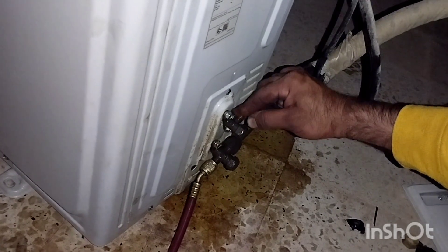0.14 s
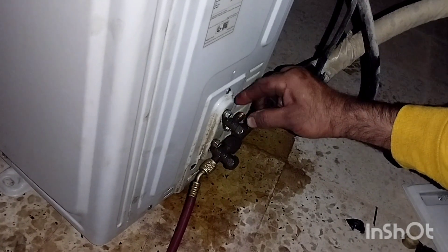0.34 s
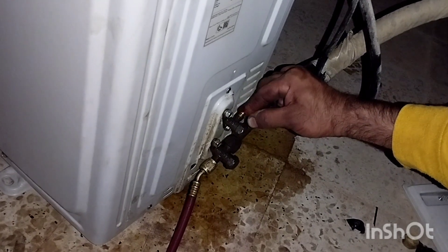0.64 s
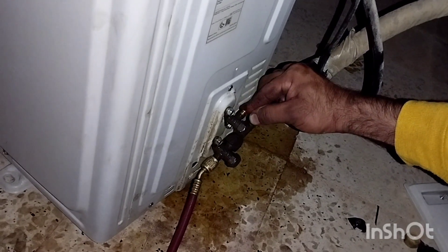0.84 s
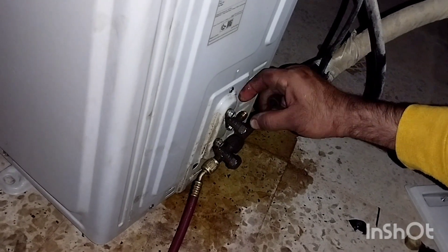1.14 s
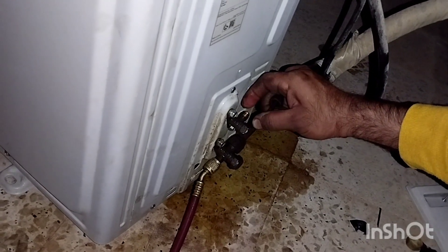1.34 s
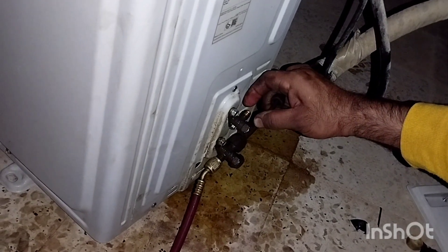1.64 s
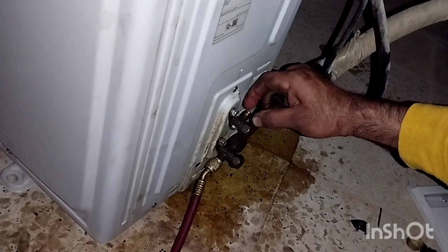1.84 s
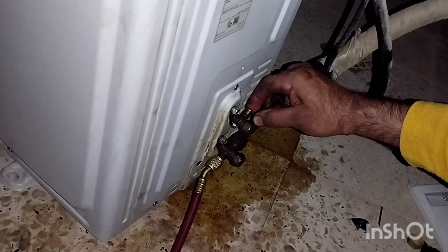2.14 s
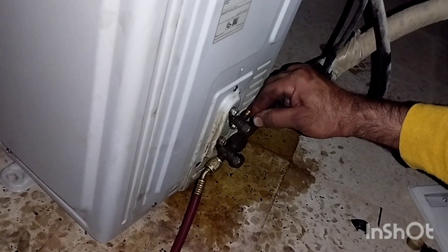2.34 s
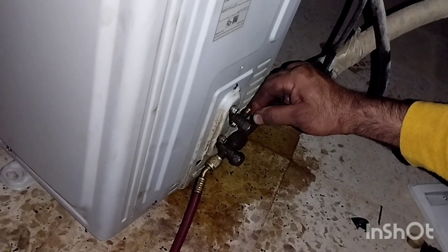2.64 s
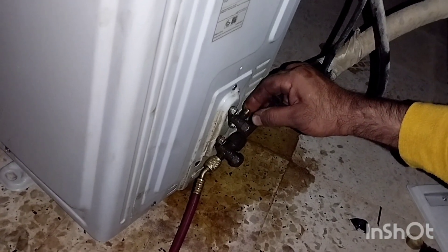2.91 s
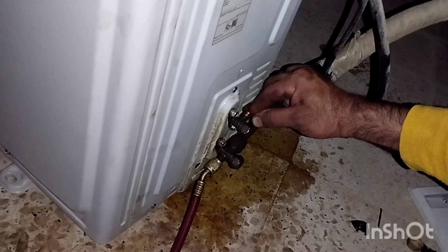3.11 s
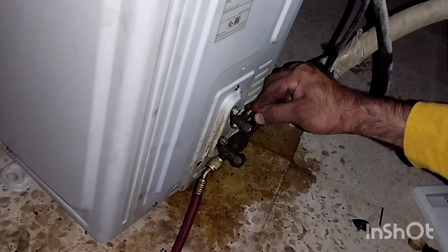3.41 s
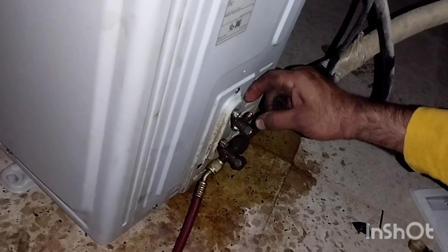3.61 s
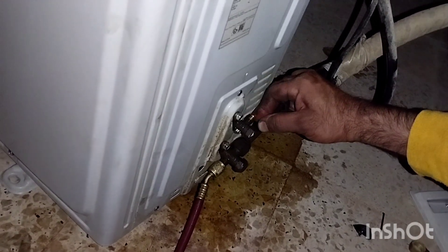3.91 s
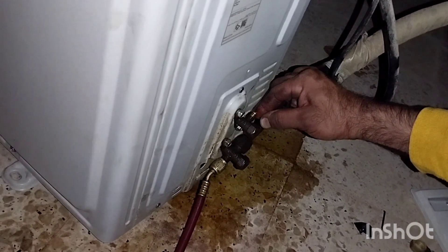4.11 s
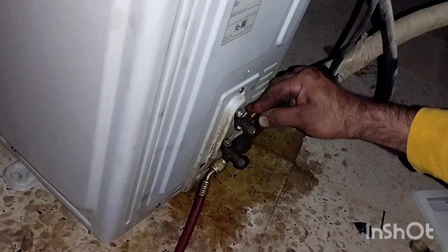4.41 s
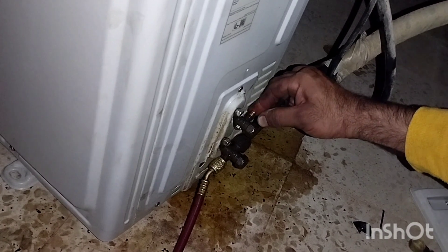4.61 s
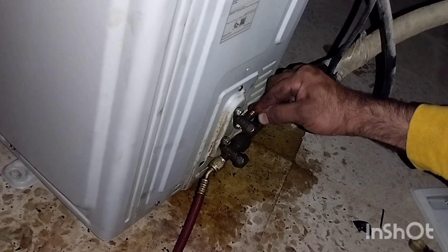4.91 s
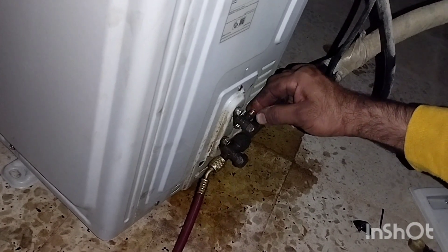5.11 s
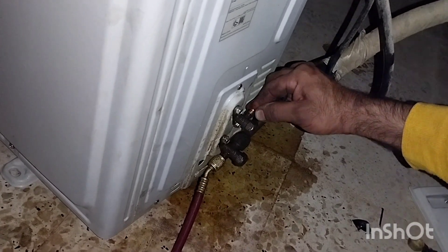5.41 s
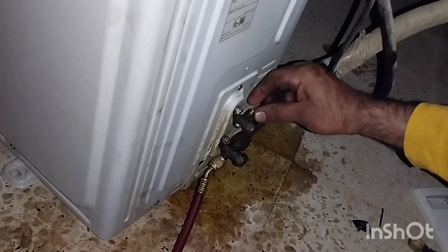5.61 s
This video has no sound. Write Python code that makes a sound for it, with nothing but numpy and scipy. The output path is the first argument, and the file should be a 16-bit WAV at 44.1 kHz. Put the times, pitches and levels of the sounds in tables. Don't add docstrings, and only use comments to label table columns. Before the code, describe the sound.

Pressurised gas hisses and spits from a small valve under a fingertip, thin whistling seeps broken by strong rushing bursts and fluttering pops.

```python
import sys
import numpy as np
from scipy import signal
from scipy.fft import rfft, irfft, next_fast_len
from scipy.io import wavfile
from scipy.ndimage import uniform_filter1d, map_coordinates

SR = 44100
rng = np.random.default_rng(int(sys.argv[2]) if len(sys.argv) > 2 else 0)


def nominal_scale(level):
    x = np.asarray(level, float) / 20
    return 10 ** x


def store_wav(level_fs):
    pcm = np.round(np.clip(np.atleast_2d(level_fs), -1, 1) * 32767)
    wavfile.write(sys.argv[1], SR, pcm.T.astype(np.int16))


N = 253575
FRAME = 256

# pitch_hz, density_db (per Hz)
ROAR = [(290, -41), (500, -2.5), (1440, -3), (1770, 5), (1950, 3.5), (2980, 6), (3920, 4), (4340, 1.5),
        (4870, 1), (6800, 3), (8210, -6.5), (9090, -26), (11000, -9), (12300, -8), (16000, -12)]
# pitch_hz, width_hz, level_db
CUP = [(3230, 240, -9), (4085, 310, -1.5), (4890, 345, 1), (5790, 690, 0.5), (7095, 360, -4.5),
       (8550, 2500, -7), (10380, 300, -9), (10860, 550, -13), (11300, 810, -17.5)]

# time_s, flow_db, pinch_db
SEEP = [(0, -44, 11), (.09, -46, 11.5), (.57, -41, 9), (.79, -42, 9.5), (2.2, -41.5, 10.5),
        (2.262, -47.5, 2), (2.29, -36.5, 16), (2.36, -39, 6.5), (2.88, -39, 6.5), (3.05, -33.5, 12),
        (3.19, -39, 4), (3.34, -37, 5.5), (3.48, -46.5, 2.5), (3.88, -37.5, 6.5), (3.942, -44, 8),
        (3.97, -40, 4.5), (4.18, -40.5, 11.5), (4.73, -45.5, 0), (5.22, -37.5, 13), (5.33, -38, 3.5),
        (5.42, -32.5, 10), (5.55, -33.5, 8)]
SEEP_CUP_DB = -1
# start_s, end_s, closing_s
SEALS = [
    (0.764, 1.045, 0.15),
    (4.738, 5.03, 0.18),
]
SEAL_DB = -25
# start_s, length_s, flow_db, pinch_db, cup_db
SNAPS = [
    (0.092, 0.038, -33.5, 10, -1.5),
    (1.035, 0.25, -23.5, 10.5, -2),
    (3.945, 0.022, -35.5, 2.5, 1),
    (4.18, 0.012, -23.5, 10.5, -6.5),
    (5.031, 0.14, -24, 9, -2.5),
    (5.533, 0.072, -26.5, 8, -1),
    (5.606, .2, -34.5, -1, -1),
]
SNAP_RISE_S, SNAP_FALL_S, SNAP_PINCH_DB_PER_S = 0.014, 0.032, 27.5
SNAP_SAG_DB_PER_S = -12.5
# start_s, rise_s, length_s, flow_db, cup_db
SWELLS = [
    (2.021, 0.06, 0.16, -28, 0.5),
    (2.551, 0.053, 0.088, -36.5, 4),
    (3.494, 0.07, 0.32, -25.5, -0.5),
    (4.517, 0.047, 0.16, -26, 3.5),
    (5.58, 0.084, .3, -32.5, 3.5),
]
SWELL_PINCH_DB, FALL_OVER_RISE, SWELL_SAG_DB_PER_S = 16.5, 1, -5.5
# start_s, length_s, flow_db, cup_db
HOLDS = [
    (0.09, 0.45, -32, -5.5),
    (1.303, 0.77, -35, -2.5),
    (2.176, 0.02, -30, -20),
    (2.672, 0.2, -39, -3.5),
    (2.89, 0.13, -30.5, -10.5),
    (3.053, 0.065, -36.5, -4.5),
    (3.81, 0.04, -32.5, -1),
    (4.18, 0.34, -31, -8),
    (5.238, 0.1, -39, -6),
]
HOLD_WHISTLE_HZ = [14900, 14900, 14500, 14550, 14500, 14400, 14500, 14750, 14550]
HOLD_PINCH_DB, HOLD_RISE_S, HOLD_FALL_S, HOLD_SWELL_DB_PER_S = 28.5, 0.038, 0.12, 1
CHOKE_DB = -7.5
RING_DB, RING_PER_CUP = -6, 0.59
RING_HZ, RING_HZ_PER_DB, OPEN_WHISTLE_HZ = 12770, -21, 14500
UPPER_DB, UPPER_DB_PER_HZ, UPPER_PIVOT_HZ = -2, .035, 14800
UPPER_HZ, LOWER_HZ, WHISTLE_WIDE_HZ = 750, 850, 440
# start_s, length_s, pitch_hz, width_hz, depth_db
ECHOES = [(.14, .2, 3650, 450, -6), (.36, .18, 3350, 450, -8), (.14, .42, 7800, 700, -8),
          (.18, .37, 6250, 300, -6), (.2, .3, 4500, 250, -4), (.24, .19, 13400, 600, -4),
          (1.36, .68, 3400, 450, -7), (1.33, .72, 7750, 600, -8), (1.33, .72, 6250, 250, -5),
          (2.12, .14, 10700, 700, -10), (2.25, .4, 8300, 800, -5), (2.65, .46, 10800, 800, -8),
          (2.91, .07, 3350, 500, -14), (2.98, .08, 3200, 500, -15), (2.91, .1, 6000, 400, -11),
          (3.62, .15, 4400, 300, -6), (3.89, .28, 10500, 1000, -8), (3.95, .22, 7600, 800, -8),
          (4.23, .29, 9350, 700, -13), (4.23, .16, 4500, 300, -10), (4.83, .09, 2800, 400, -10),
          (2.3, .3, 9500, 350, -6), (4.25, .25, 13000, 500, -3), (4.23, .28, 3300, 800, -5),
          (4.56, .14, 3450, 500, -13), (4.73, .1, 10400, 1000, -8), (5.22, .14, 10700, 800, -11),
          (3.19, .16, 10700, 600, -8), (3.27, .2, 9300, 700, -6), (0, .09, 10200, 800, -7)]
ECHO_FADE_S = 0.036

# pitch_hz, width_hz, level_db
FLAP = [(253.4, 98, -7), (394.7, 119, -7.5)]
# pitch_hz, width_hz, level_db
HOLLOW = [(548.8, 39, -4.5), (700.5, 234, -5.5), (1013, 253, -4), (1281, 195, -5), (1423, 370, 0),
          (1610, 130, 0.5), (1862, 270, -8.5)]
# start_s, length_s, flap_db, hollow_db
FLUTTERS = [(0.093, 0.035, -38, -37), (0.53, 0.028, -62, -43), (0.62, 0.19, -51, -47),
            (1.05, 0.051, -35.5, -38), (2.276, 0.19, -32, -38.5), (2.345, 0.05, -50, -31.5),
            (2.484, 0.11, -39.5, -41), (2.613, 0.04, -36, -36.5), (2.656, 0.051, -40.5, -60),
            (2.728, 0.11, -46, -53), (3.125, 0.014, -39, -40), (3.15, 0.29, -48, -54),
            (3.488, 0.088, -42, -35), (3.58, 0.068, -34, -36.5), (3.95, 0.017, -32.5, -28),
            (3.972, 0.06, -28, -34), (4.058, 0.015, -29, -28), (4.087, 0.018, -30.5, -34),
            (4.124, 0.062, -33, -40.5), (4.177, 0.016, -31, -46), (4.297, 0.28, -56, -47.5),
            (5.052, 0.041, -34, -27), (5.557, 0.0082, -21, -40), (5.647, .16, -33.5, -36)]
FLUTTER_RISE_S, FLUTTER_FALL_S = 0.0098, 0.045
FLAP_DB, FLAP_REST_DB, HOLLOW_DB = -6, -56.5, 1.13

# start_s, swing_hz, left_push, right_push (full scale)
POPS = [
    (3.632, 2.4, 0.15, -0.076),
    (4.186, 125, 0.13, 0.091),
    (4.185, 2.9, -0.039, -0.033),
    (5.57, 2.4, 0.066, -0.61),
]

# pitch_hz, density_db (per Hz)
YARD = [(12, -57), (20, -7), (53, 1), (81, -4.5), (116, -1.5), (241, -9), (301, -15), (410, -15.5),
        (446, -19), (574, -27.5), (1500, -26.5), (3100, -46), (4800, -50), (7000, -52), (8600, -48),
        (10000, -45), (11000, -37), (13000, -37), (16000, -43)]
YARD_DB = -40
# pitch_hz, left_minus_right_db
YARD_LEAN = [(7000, -0.5), (10000, 4), (11500, 8), (15500, 2)]
# pitch_hz, level_db (rms)
HUM = [(58.5, -90), (117, -54.5), (175, -60.5), (234, -60.5)]

# pitch_hz, likeness (0 to 1)
ALIKE = [(100, 0.94), (400, 0.99), (800, 1), (1600, 0.77), (2300, 1), (3000, 0.13), (6000, 0.91),
         (9300, 0.39), (10000, .4), (10700, 1), (11500, .3), (15000, 0.3)]
# pitch_hz, left_minus_right_db
LEAN = [(200, 6), (450, -8), (770, 4), (1300, -6), (2600, 2.5), (4200, 1.5), (6600, -5), (7500, -5.5),
        (8600, 4), (9500, 5.5), (10800, 2.5), (11500, 4), (12800, 9.5), (15500, 2)]
# pitch_hz, left_lead_rad
LEAD = [(340, 0), (690, 1.38), (1030, 0.67), (1400, 1.5), (2070, 1.5), (2450, 1), (2800, 2.55), (3400, 2),
        (3750, 1.1), (4150, 0.5), (4500, 2), (4800, 0.56), (6100, 2.5), (6500, -0.1), (7500, 3.5),
        (8200, -0.14), (9300, 2.5), (9900, 0.5), (10600, 3.5), (12200, 5.5), (13600, 3), (14200, 2),
        (14900, 1.5)]
DRIFT_RAD, TIGHT_ALIKE = .24, .96
# pitch_hz, level_db
HOUSING = [(7000, -1), (7700, 0.5), (8200, -6), (8650, -2.5), (9100, 2)]
# pitch_hz, level_db
SHADOW = [(9300, 0), (10000, -3), (10500, -2), (11300, -10), (12000, -3), (12800, 0)]
TOP_HZ = 15850
# pitch_hz, margin_db
MARGIN = [(2300, 12), (2800, 8), (3400, 5), (4500, 6), (5200, 8), (6300, 6), (7300, 4.5), (8200, 2.5),
          (9400, 2.5), (10600, 2), (11400, 8), (13300, 11)]
FAINT_DB, STRONG_DB = -2.5, 4.5
FICKLE_DB, BLOCK_LEAD = 1.8, 781


def unit(x):
    return x / np.sqrt(np.mean(x ** 2) + 1e-20)


def along(points, hz):
    f, v = np.transpose(points)
    return np.interp(np.log(hz + 1), np.log(f + 1), v)


def curves(rows, t):
    s, *cols = np.transpose(rows)
    return [np.interp(t, s, c) for c in cols]


def wobble(rate, count):
    knots = N * rate / SR
    return map_coordinates(rng.standard_normal(int(knots) + 4), [np.linspace(0, knots, count)])


def bell(hz, center, width):
    return 1 / (1 + (2 * (hz - center) / width) ** 2) ** 2


def resonant(modes, hz):
    return sum(nominal_scale(2 * db) * bell(hz, center, width) for center, width, db in modes)


def share(power, db):
    return power / power.sum(axis=0) * nominal_scale(2 * db)


def stroke_db(t, start, rise, length, fall):
    before = 1 - (t - start) / rise
    after = (t - start - length) / fall
    return -20 * np.maximum(np.maximum(before, after), 0)


def short_frames():
    hz = np.fft.rfftfreq(FRAME, 1 / SR)[:, None]
    return hz, np.arange(4 * N // FRAME + 5) * FRAME / 4 / SR


def at_ports(power, alike, patchy_db):
    hz, t = short_frames()
    overlap = FRAME * 3 // 4
    noise = rng.standard_normal((2, N + FRAME))
    z = signal.stft(noise, nperseg=FRAME, noverlap=overlap)[2][..., :len(t)]
    z = z / np.sqrt(np.mean(abs(z) ** 2))
    slow = uniform_filter1d(rng.standard_normal((2, *power.shape)), size=4, axis=1)
    patches, drift = unit(uniform_filter1d(slow, size=120, axis=2))
    turn = np.arccos(np.clip(alike, 0, 1)) / 2
    mid, side = z[0] * np.cos(turn), z[1] * np.sin(turn)
    phase = along(LEAD, hz) / 2 + DRIFT_RAD * drift * np.minimum(hz / 7000, 1)
    lean = nominal_scale(along(LEAN, hz) / 2) * np.exp(1j * phase)
    pair = np.array([(mid + side) * lean, (mid - side) / lean])
    pair = pair * np.sqrt(power) * nominal_scale(patchy_db * patches)
    return signal.istft(pair, nperseg=FRAME, noverlap=overlap)[1][:, :N]


def valve(t):
    seep_db, seep_pinch_db = curves(SEEP, t)
    for start, end, closing in SEALS:
        seep_db = seep_db + SEAL_DB * np.clip((t - start) / closing, 0, 1) * (t < end)
    moves = []
    for (start, length, db, cup_db), hz in zip(HOLDS, HOLD_WHISTLE_HZ):
        shape_db = stroke_db(t, start, HOLD_RISE_S, length, HOLD_FALL_S)
        seep_db = seep_db + CHOKE_DB * nominal_scale(shape_db)
        moves.append((db + HOLD_SWELL_DB_PER_S * (t - start) + shape_db, HOLD_PINCH_DB, cup_db, hz))
    moves.append((seep_db, seep_pinch_db, SEEP_CUP_DB, OPEN_WHISTLE_HZ))
    for start, length, db, pinch_db, cup_db in SNAPS:
        shape_db = stroke_db(t, start, SNAP_RISE_S, length, SNAP_FALL_S)
        flow_db = db + SNAP_SAG_DB_PER_S * (t - start) + shape_db
        moves.append((flow_db, pinch_db + SNAP_PINCH_DB_PER_S * (t - start), cup_db, OPEN_WHISTLE_HZ))
    for start, rise, length, db, cup_db in SWELLS:
        shape_db = stroke_db(t, start, rise, length, FALL_OVER_RISE * rise)
        flow_db = db + SWELL_SAG_DB_PER_S * (t - start) + shape_db
        moves.append((flow_db, SWELL_PINCH_DB, cup_db, OPEN_WHISTLE_HZ))

    def total_db(offset):
        return 10 * np.log10(sum(nominal_scale(2 * (db + offset(pinch, cup))) for db, pinch, cup, _ in moves))

    roar_db = total_db(lambda pinch, cup: -pinch)
    cup_db = total_db(lambda pinch, cup: cup)
    ring_db = total_db(lambda pinch, cup: RING_DB + RING_PER_CUP * cup)
    whistle_db = total_db(lambda pinch, cup: 0)
    ring_hz = RING_HZ + RING_HZ_PER_DB * (whistle_db - roar_db)
    whistle_hz = sum(nominal_scale(2 * (db - whistle_db)) * hz for db, _, _, hz in moves)
    return roar_db, cup_db, ring_db, ring_hz, whistle_db, whistle_hz


def hand_echo_db(hz, t):
    return sum(db * nominal_scale(stroke_db(t, start, ECHO_FADE_S, length, ECHO_FADE_S)) * bell(hz, center, width)
               for start, length, center, width, db in ECHOES)


def jet():
    hz, t = short_frames()
    roar_db, cup_db, ring_db, ring_hz, whistle_db, whistle_hz = valve(t)
    surge_db = 1.1 * wobble(24.856, len(t)) + 0.5 * wobble(90, len(t))
    opening = nominal_scale(np.clip(0.71 * (roar_db - whistle_db + 28.0), 0, 11))
    roar = share(nominal_scale(2 * along(ROAR, hz)), roar_db + 10.5)
    cup_modes = [(center, width * opening ** 0.85, db) for center, width, db in CUP]
    cup = share(resonant(cup_modes, hz), cup_db + 2.0)
    ring = share(resonant([(ring_hz, 650 * opening, 0)], hz), ring_db - 1.5)
    wide = WHISTLE_WIDE_HZ * opening
    upper_db = UPPER_DB + UPPER_DB_PER_HZ * (whistle_hz - UPPER_PIVOT_HZ) / opening ** 2
    lower_db = -11 + 16 * np.log10(opening)
    partners = [(whistle_hz, wide, 0), (whistle_hz + UPPER_HZ, wide, upper_db),
                (whistle_hz - LOWER_HZ, wide, lower_db)]
    whistle = share(resonant(partners, hz), whistle_db)
    rings = cup + ring + whistle
    alike = (roar * along(ALIKE, hz) + rings * TIGHT_ALIKE / opening ** 0.57) / (roar + rings)
    power = (roar + rings) * nominal_scale(2 * (surge_db + hand_echo_db(hz, t)))
    return at_ports(power, alike, patchy_db=1.0)


def skin(t):
    roar_db = valve(t)[0]
    flap = nominal_scale(2 * (roar_db + FLAP_DB)) + nominal_scale(2 * FLAP_REST_DB)
    hollow = nominal_scale(2 * (roar_db + HOLLOW_DB))
    for start, length, flap_db, hollow_db in FLUTTERS:
        shape_db = stroke_db(t, start, FLUTTER_RISE_S, length, FLUTTER_FALL_S)
        flap = flap + nominal_scale(2 * (shape_db + flap_db))
        hollow = hollow + nominal_scale(2 * (shape_db + hollow_db))
    return 10 * np.log10(flap), 10 * np.log10(hollow)


def finger():
    hz, t = short_frames()
    flap_db, hollow_db = skin(t)
    flap = share(resonant(FLAP, hz), flap_db + 0.21 * wobble(33, len(t)))
    hollow = share(resonant(HOLLOW, hz), hollow_db - 0.58 + 1.9 * wobble(70, len(t)))
    lumps = at_ports(flap + hollow, along(ALIKE, hz), patchy_db=2.0)
    m = next_fast_len(N)
    modes = resonant(FLAP + HOLLOW, np.fft.rfftfreq(m, 1 / SR))
    sharp = np.sqrt(modes / uniform_filter1d(modes, size=2 * m // FRAME))
    return irfft(rfft(lumps, m) * sharp, m)[:, :N]


def pops():
    out, t = np.zeros((2, N + SR)), np.arange(SR // 2) / SR
    for start, hz, *push in POPS:
        decay = np.exp(-t * hz ** 0.54 / 0.098)
        onset = 1 - np.exp(-t / 0.0005)
        swing = decay * np.cos(2 * np.pi * hz * t + 1.0) * onset
        out[:, round(start * SR):][:, :len(t)] += np.outer(push, swing)
    return out[:, :N]


def compressor():
    t = np.arange(N) / SR
    hum = np.zeros(N)
    for hz, db in HUM:
        level = nominal_scale(db + 6.0 + 3.2 * wobble(7.2, N))
        hum += level * np.sin(2 * np.pi * hz * t + 3.27 * wobble(8, N))
    return hum


def yard():
    m = next_fast_len(N)
    hz = np.fft.rfftfreq(m, 1 / SR)
    unlike = along([(30, 0.62), (70, 0.15), (150, 0.088), (1000, 0.91), (5000, 1.0)], hz)
    tone = nominal_scale(along(YARD, hz)) * [np.ones_like(hz), unlike]
    a, b = irfft(rfft(rng.standard_normal((2, m))) * tone, m)[:, :N]
    lean = nominal_scale(along(YARD_LEAN, hz) * [[.5], [-.5]])
    rumble = irfft(rfft([a + b, a - b], m) * lean, m)[:, :N]
    return nominal_scale(YARD_DB - 3.0 + 0.12 * wobble(3.3, N)) * unit(rumble)


def scene():
    return jet() + finger() + pops() + compressor() + yard()


def masked(x):
    turn = np.array([[1, 1], [1, -1]]) / np.sqrt(2)
    padded = np.pad(turn @ x, ((0, 0), (BLOCK_LEAD, 0)))
    hz, _, z = signal.stft(padded, SR, nperseg=2048, window="cosine")
    width = 8
    power = uniform_filter1d(abs(z) ** 2, size=width, axis=1)[:, width // 2::width]
    chance = uniform_filter1d(rng.standard_normal(power.shape), size=2, axis=2)
    chance = uniform_filter1d(chance, size=2, axis=1)

    def spread(bands):
        return np.repeat(bands, width, axis=1)[:, np.minimum(np.arange(len(hz)), len(hz) - width)]

    around = uniform_filter1d(spread(power).mean(axis=0), size=160, axis=0)
    bar = around * nominal_scale(-2 * along(MARGIN, hz))[:, None]
    luck = spread(nominal_scale(2 * FICKLE_DB * unit(chance)))
    line = abs(z) ** 2 * luck / bar
    clear = (spread(power) * luck > bar) & (line > nominal_scale(2 * FAINT_DB))
    kept = clear | (line > nominal_scale(2 * STRONG_DB)) | (hz[:, None] < MARGIN[0][0])
    return turn @ signal.istft(z * kept, SR, nperseg=2048, window="cosine")[1][:, BLOCK_LEAD:][:, :N]


def low_pass(x):
    return signal.sosfilt(signal.butter(12, 17100, fs=SR, output="sos"), x)


def record(dry):
    power = uniform_filter1d(dry ** 2, size=900, axis=1)
    drain = signal.butter(2, 1.33, "high", fs=SR)
    offset = signal.lfilter(*drain, power, axis=1) * [[2.2], [1.6]]
    m = next_fast_len(N)
    hz = np.fft.rfftfreq(m, 1 / SR)
    housing_db = along(HOUSING, hz) + [[0], [1]] * along(SHADOW, hz)
    heard = irfft(rfft(dry, m) * nominal_scale(housing_db), m)[:, :N]
    limited = irfft(rfft(masked(heard), m) * (hz < TOP_HZ), m)[:, :N]
    return low_pass(limited + offset)


dry = scene()
out = record(dry)
store_wav(out)
```